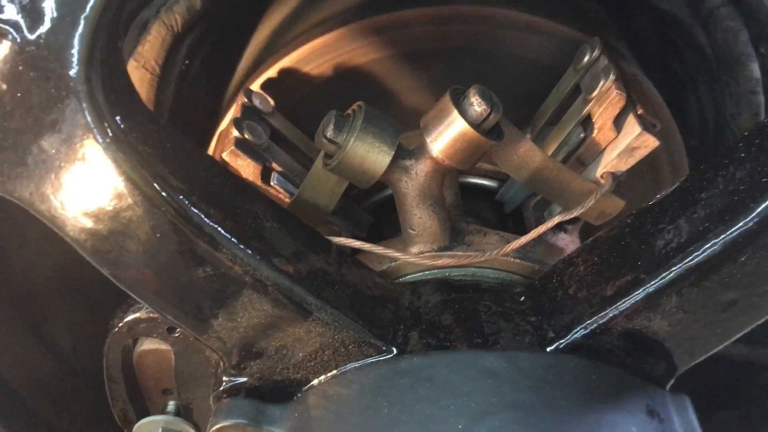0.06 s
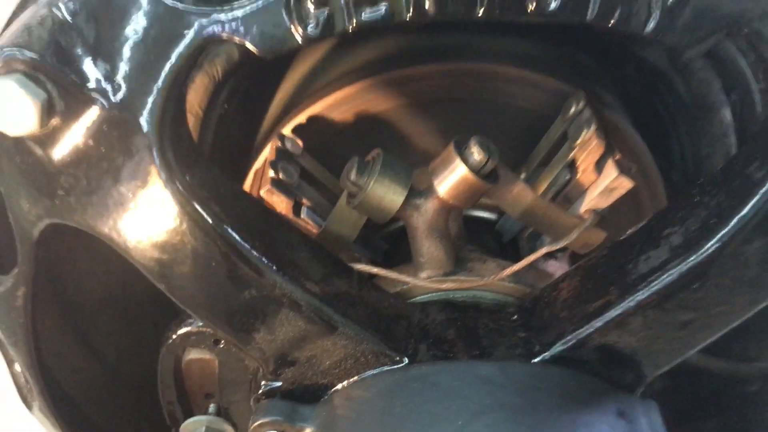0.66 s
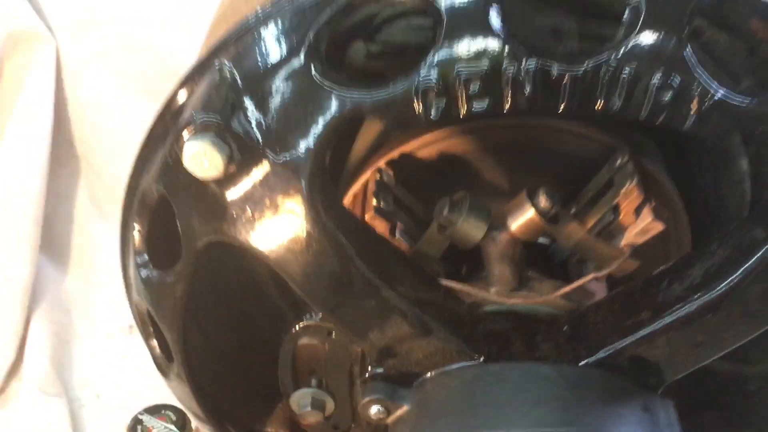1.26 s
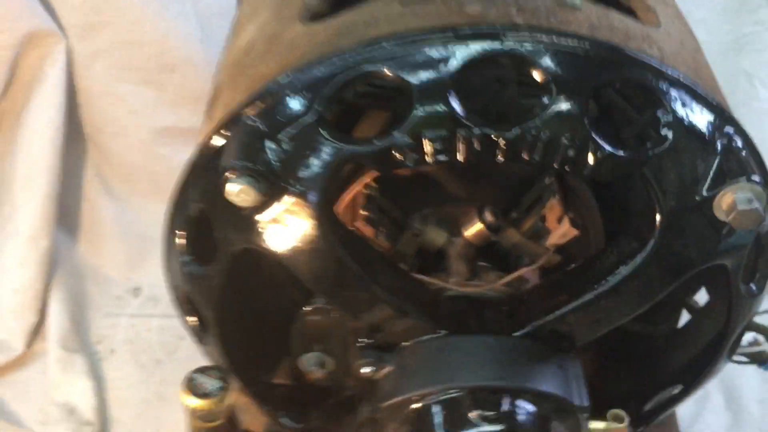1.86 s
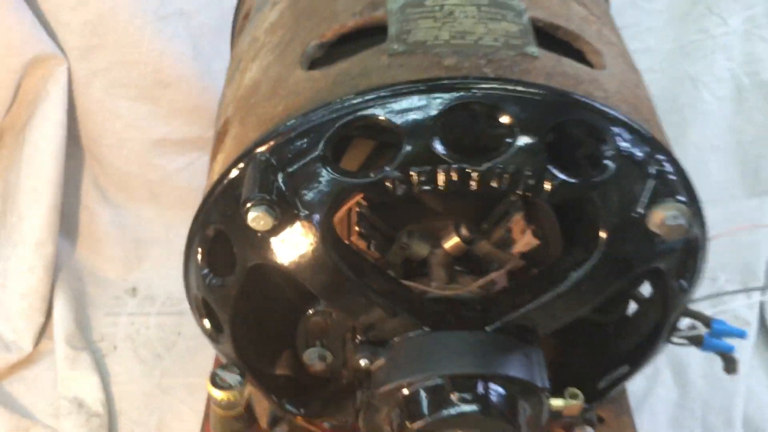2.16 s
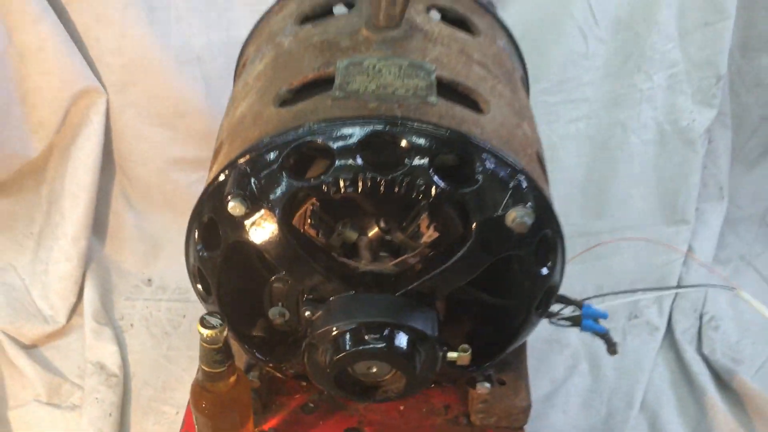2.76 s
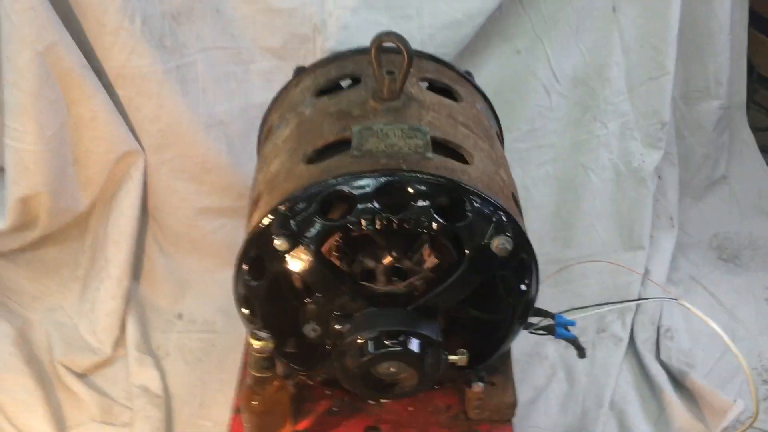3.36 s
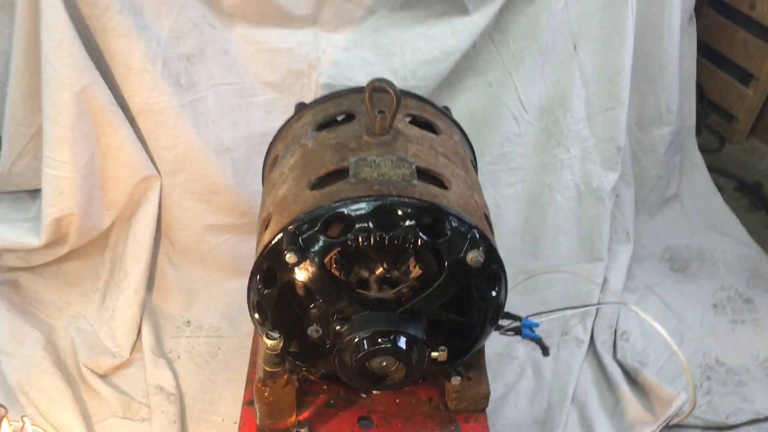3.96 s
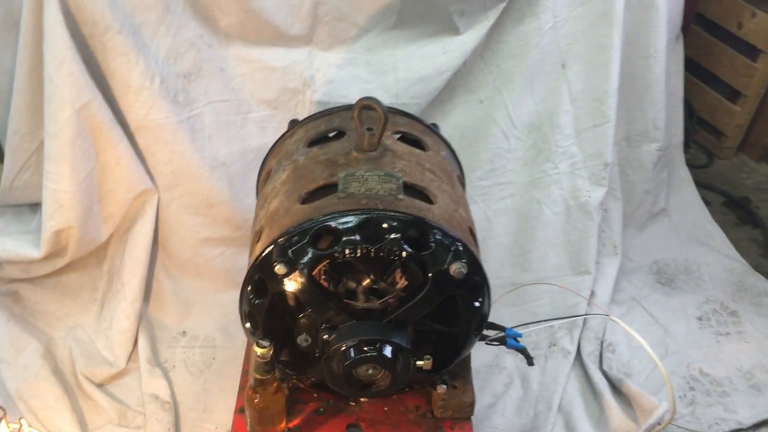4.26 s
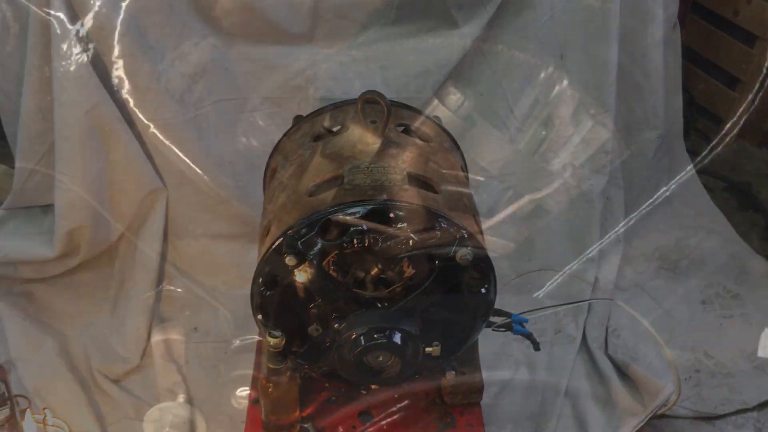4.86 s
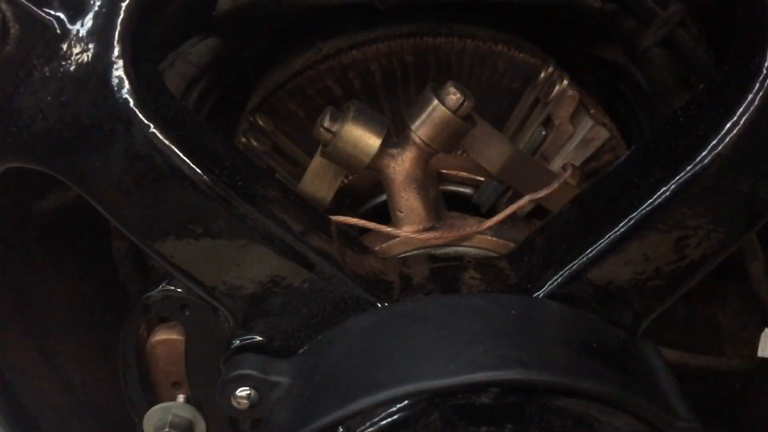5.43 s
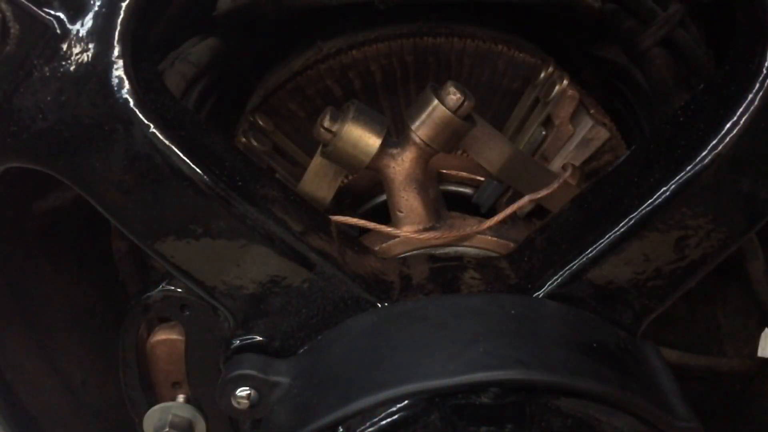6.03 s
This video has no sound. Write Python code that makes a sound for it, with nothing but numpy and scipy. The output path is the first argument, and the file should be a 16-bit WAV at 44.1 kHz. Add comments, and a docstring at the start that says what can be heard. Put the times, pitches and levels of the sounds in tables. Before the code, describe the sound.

Heard up close in a dry-sounding workshop, the brushes of a spinning electric motor rasp and sizzle in a quick rhythm. The pulsing slows gradually and the drone beneath it sinks as the microphone moves away with slight bumps and rumble. Then the motor sound ends suddenly, and only a low room hum and a brief, faint rustle remain.

```python
"""In a quiet workshop, an old open-frame electric motor coasts down as the microphone backs away.
Sliding friction between brushes and commutator makes a scraping that swells four times a turn;
the passing bars add a falling drone, coloured by the resonances of the iron housing.
The motor's sound ends abruptly, leaving the hum of the room and a soft rustle.
A hand on the camera adds low bumps and rumble."""
import sys
import numpy as np
from scipy import signal
from scipy.fft import rfft, irfft, next_fast_len
from scipy.io import wavfile
from scipy.ndimage import uniform_filter1d

SR = 44100
rng = np.random.default_rng(int(sys.argv[2]) if len(sys.argv) > 2 else 0)


def master(y):
    """Save y as 16-bit WAV."""
    cut = np.clip(np.atleast_2d(y).T, -1, 1)
    pcm = np.round(cut * 32767)  # scale
    wavfile.write(sys.argv[1], SR, pcm.astype(np.int16))


N = 272979
T = np.arange(N) / SR
FFT_SIZE = next_fast_len(N + SR // 2, True)
HZ = np.maximum(np.fft.rfftfreq(FFT_SIZE, 1 / SR), 1)
START_TURNS_PER_S, BAR_COUNT = 12.1078, 61
ROOM_ONSET_S = 4.4   # rumble, air and hum begin to rise


def from_db(db):
    """Amplitude ratio of a level in decibels."""
    return 10 ** (np.asarray(db) / 20)


def unit_rms(x):
    """Normalisation to unit mean power."""
    return x / np.sqrt(np.mean(x ** 2) + 1e-20)


def in_time(rows):
    """Linear interpolation of (t/s, value) at every sample."""
    return np.interp(T, *np.transpose(rows))


def spells(rows, fade_s):
    """Sum of trapezoidal envelopes (t/s, duration/s, level/dB)."""
    return sum(from_db(db) * np.clip(.5 + np.minimum(T - start, start + length - T) / fade_s, 0, 1)
               for start, length, db in rows)


def bell(offset, width):
    """Gaussian curve of unit height."""
    return np.exp(-.5 * (offset / width) ** 2)


def spectrum_db(points):
    """Interpolation of (f/Hz, level/dB) on a logarithmic frequency axis."""
    hz, db = np.transpose(points)
    return np.interp(np.log(HZ), np.log(hz), db)


def colour(x, db):
    """Minimum-phase filtering: folding the cepstrum makes the response causal."""
    cepstrum = irfft(np.log(from_db(db)), FFT_SIZE)
    cepstrum[1:FFT_SIZE // 2] *= 2
    cepstrum[FFT_SIZE // 2 + 1:] = 0
    return irfft(rfft(x, FFT_SIZE) * np.exp(rfft(cepstrum)), FFT_SIZE)[:N]


def noise(points):
    """Spectrally shaped Gaussian noise of unit rms."""
    return unit_rms(colour(rng.standard_normal(N), spectrum_db(points)))


def drift(per_s):
    """Random modulation of unit rms, with per_s new values a second."""
    return unit_rms(np.interp(T * per_s, np.arange(N), rng.standard_normal(N)))


def band(x, low_hz, high_hz):
    """Steep, maximally flat band-pass."""
    return signal.sosfilt(signal.butter(5, [low_hz, high_hz], "band", fs=SR, output="sos"), x)


def steady(x):
    """Division by the running rms evens the slow level and keeps the throb."""
    power = uniform_filter1d(uniform_filter1d(x ** 2, SR // 4), SR // 4)
    return x / np.sqrt(power + 1e-20)


def room_tone(air_db=-56.5, waver_db=4.0, early_db=-9.5, rise_s=0.72):
    """Amplitude-modulated hum partials over broadband air noise; both rise late to full level."""
    # workshop hum: f/Hz, level/dB
    partials = [(70.0, -69.5), (215.3, -66), (317.6, -63.5), (430.7, -73.5)]
    # air noise: f/Hz, relative density level/dB
    air_spectrum = [(120, -8), (200, -8.5), (320, -3), (420, 0.5), (650, 2), (850, -1), (1050, -5),
                    (2100, -6.5), (2800, -10.5), (6500, -19.5), (10000, -26.5), (15000, -32)]
    hum = 0
    for hz, db in partials:
        amplitude = np.sqrt(2) * from_db(db + waver_db * drift(5.6))
        hum += amplitude * np.sin(2 * np.pi * (hz * T + rng.random()))
    air = from_db(air_db) * noise(air_spectrum)
    return (hum + air) * from_db(np.interp(T - ROOM_ONSET_S, [0, rise_s], [early_db, 0]))


def rumble(early_db=-69, late_db=-56.5, rise_s=.15):
    """Low-frequency noise of the room, with structure-borne surges as the hand shifts its grip."""
    # shifts of grip: t/s, duration/s, level/dB
    grips = [(2.2, 0.11, -56), (3.87, 0.068, -66), (4.49, 0.13, -49), (5.15, 0.43, -62)]
    # rumble: f/Hz, relative density level/dB
    spectrum = [(20, -28.5), (32, -6.5), (45, -4.5), (60, -0.5), (110, -5.5), (170, -8.5), (260, -10.5),
                (400, -37), (700, -77)]
    floor = from_db(np.interp(T - ROOM_ONSET_S, [0, rise_s], [early_db, late_db]))
    return (floor + spells(grips, fade_s=0.042)) * noise(spectrum)


def rustle():
    """Short bursts of broadband noise, heard as a soft rustle at the end."""
    # strokes: t/s, duration/s, level/dB
    strokes = [(5.45, .22, -64), (5.59, 0.044, -62), (5.675, 0.14, -54.5), (5.94, .085, -62)]
    # rustle: f/Hz, relative density level/dB
    spectrum = [(350, -41), (600, -7), (715, -14), (1310, -14), (1650, -3), (2900, -13.5), (3230, -10.5),
                (6510, -10.5), (15000, -20)]
    return spells(strokes, fade_s=0.025) * noise(spectrum)


def camera_bumps(attack_s=.004):
    """Soft impacts of the hand excite damped normal modes of the camera case."""
    # impacts: t/s, excitation level/dB
    knocks = [(2.196, -31), (3.014, -32.5), (4.666, -32)]
    # case modes: f/Hz, gain/dB, T60/s
    modes = [(60.4, -20, 0.29), (135, -12.5, 0.12), (207, -4.5, 0.091), (300, -3.5, 0.05), (360, -6, 0.14)]
    out = np.zeros(N)
    for start, knock_db in knocks:
        t = np.maximum(T - start, 0)
        push = from_db(knock_db) * np.minimum(t / attack_s, 1)
        for k, (hz, db, t60) in enumerate(modes):
            decay = np.exp(-np.minimum(np.log(1000) * t / t60, 20))
            out += (-1) ** k * push * from_db(db) * np.sin(2 * np.pi * hz * t) * decay
    return out


def reverberate(x, t60=0.14, wet_db=-15.5):
    """Direct sound plus a faint diffuse field that decays exponentially in the cloth-damped room."""
    t = T[:SR // 3]
    tail = rng.standard_normal(len(t)) * from_db(-60 * t / t60) * (t > .004)
    return x + from_db(wet_db) * signal.fftconvolve(x, tail / np.linalg.norm(tail))[:N]


def shaft(friction_turns_per_s2=.5893, drag_per_s=.04656, start_turns=.1192):
    """Speed (turns/s) and angle (turns) of a rotor slowed by dry friction and linear air drag."""
    balance = friction_turns_per_s2 / drag_per_s
    speed = (START_TURNS_PER_S + balance) * np.exp(-drag_per_s * T) - balance
    return speed, start_turns + np.cumsum(speed) / SR


def bar_lines(speed, angle, resonance_hz=497, width_hz=19, swell_db=10):
    """Uneven bars excite shaft harmonics; any that glides through the housing resonance swells."""
    # harmonics: f / shaft frequency
    orders = (51, 59, 63, 71, 122, 127, 180, 184)
    # their strengths: relative level/dB
    levels = (3.8, 11.3, 13.3, 2.3, 3.5, 10, 10, 8.3)
    out = 0
    for order, db in zip(orders, levels):
        in_tune = bell(order * speed - resonance_hz, width_hz)
        out += 2 * from_db(db + swell_db * in_tune) * np.sin(2 * np.pi * (order * angle + rng.random()))
    return out * (speed / START_TURNS_PER_S) ** 0.84   # weaker as the shaft slows


def commutator(speed, angle, fine_order=900.0, fresh_db=-5.0, wander_per_s=1.493, size=32768):
    """Quasi-periodic excitation: much the same roughness passes each turn, its finest detail new."""
    # roughness humps at successive multiples of the bar rate: level/dB, width/shaft orders
    bar_humps = [(5, 10), (8.5, 6), (2, 7), (5.5, 5), (1.5, 6)]
    orders = np.arange(size // 2 + 1)
    humps_db = sum(db * bell(orders - k * BAR_COUNT, width) for k, (db, width) in enumerate(bar_humps, 1))
    height = from_db(humps_db) / np.hypot(1, orders / fine_order)
    # end play of the shaft slides the brushes slowly between four neighbouring tracks
    tracks = size * irfft(height * np.exp(2j * np.pi * rng.random((4, len(orders)))))
    shares = np.array([drift(wander_per_s) for track in tracks])
    shares /= np.linalg.norm(shares, axis=0)
    worn = sum(share * np.interp(angle % 1 * size, np.arange(size), track)
               for share, track in zip(shares, tracks))
    bars = bar_lines(speed, angle)
    samples_per_turn = SR / speed.mean()
    high_pass = HZ / np.hypot(HZ, fine_order * speed.mean())
    fresh = colour(rng.standard_normal(N), 20 * np.log10(np.hypot(from_db(fresh_db), high_pass)))
    return (worn + bars) / np.sqrt(samples_per_turn) + fresh


def brush_force(angle, snag_turns=0.035, wander_db=1.5):
    """Normal force, light contact being 1: smooth swells at high spots, a sudden snag at each burr."""
    # high spots: angle/turns, width/turns, force level/dB
    high_spots = [(.015, 0.035, 1.5), (.17, 0.013, -10), (.255, 0.044, 6), (.5, 0.051, 3.5),
                  (.76, 0.037, 2)]
    # two burrs: angle/turns
    burr_angles = (.715, .97)
    # each burr grazing the brush: force level/dB
    graze_levels = (-1, 2)
    # a burr catching hard: t/s, duration/s, force level/dB, burr index
    catches = [(0.93, 0.22, 7, 0), (2.698, 0.44, 8, 1), (3.53, 0.87, 9.5, 0), (4.55, .16, 10.5, 0),
               (4.86, 0.52, 4.5, 1)]
    swells = sum(from_db(db) * bell((angle - at + .5) % 1 - .5, width) for at, width, db in high_spots)
    snags = 0
    for k, (at, graze_db) in enumerate(zip(burr_angles, graze_levels)):
        caught = spells([spell for *spell, burr in catches if burr == k], fade_s=.12)
        snags += (from_db(graze_db) + caught) * np.exp(-((angle - at) % 1) / snag_turns)
    snags = uniform_filter1d(snags, SR // 700)   # compliance of the carbon rounds the edge
    return 1 + (swells + snags) * from_db(wander_db * drift(50))


def housing(x, away):
    """Resonances and notches of the iron shell filter the scraping, differently near and far."""
    # spectral envelope of the scraping: f/Hz, gain/dB
    envelope = [(100, -37), (260, -28.5), (420, -17), (620, -14), (1300, -12), (1750, -12), (2300, -2.5),
                (3600, -1.5), (5500, -3.5), (8000, 1.5), (9500, -2), (10400, -10.5), (13300, -11.5),
                (15800, -21)]
    # resonances and notches: f/Hz, width/Hz, near gain/dB, far gain/dB
    resonances = [(206, 17, 12, -1), (340, 27, 3, 2.5), (459, 16, -0.5, -5), (489, 20.6, 8, 11),
                  (552.5, 31.4, 3, 11.5), (708, 36, 8, 3), (848, 25.5, 6.5, 13), (957, 96, -7, -7),
                  (1087, 43, 5, 5), (1193, 16.5, 7.5, 8), (1717, 14, 0.5, 7), (1810, 40, 1.5, -2),
                  (1983, 110, 6, -2.5), (2170, 64, 1.5, 4.5), (2290, 63, -6, -1.5), (2800, 160, -7, -0.5),
                  (3120, 60, -2.5, 6), (3454, 260, 5, -0.5), (4540, 320, 4, 1.5), (4890, 55.5, -8, -7.5),
                  (5170, 95, 3.5, -0.5), (7400, 210, 0, 2), (7820, 320, -5.5, -3), (8800, 340, 1.5, 0),
                  (12200, 680, 4, -0.5)]
    near = far = spectrum_db(envelope)
    for hz, width_hz, near_db, far_db in resonances:
        peak = bell(HZ - hz, width_hz)
        near, far = near + near_db * peak, far + far_db * peak
    return (1 - away) * colour(x, near) + away * colour(x, far)


def holder_song(force, ring_hz=2194.0, bandwidth_hz=54.0, quiet_db=-24):
    """Forced vibration: friction drives a narrow resonance of a brush holder, faint between songs."""
    # songs: t/s, duration/s, level/dB re the rasp
    songs = [(2.76, 0.25, -12), (4.62, .13, -11.5), (5.4, 0.046, -23)]
    b, a = signal.iirpeak(ring_hz, ring_hz / bandwidth_hz, fs=SR)
    ring = unit_rms(signal.lfilter(b, a, force ** 2 * rng.standard_normal(N)))
    return (from_db(quiet_db) + spells(songs, fade_s=0.052)) * ring


def motor(sizzle_db=-0.75, drone_near_db=-18.5, drone_far_db=-11.5, end_s=5.443):
    """Sliding friction: the higher the band, the more it follows brush force and carbon grit."""
    # microphone path: t/s, position (0 at the brush opening, 1 a metre away)
    path = [(0, 0.15), (1, 0.099), (2, 0.46), (3.2, 0.85), (5.4, 0.87)]
    # rasp at the microphone, the reference for the other parts: t/s, level/dB
    levels = [(0, -21.5), (0.7, -21), (1.5, -22.5), (1.97, -21), (2.95, -25), (4.2, -28), (5.44, -30)]
    speed, angle = shaft()
    away = np.clip(in_time(path), 0, 1)
    friction, force, grit_db = commutator(speed, angle), brush_force(angle), drift(2500)
    drone = band(friction * force ** 0.11, 60, 1400)
    rasp = band(friction * force ** 0.54 * from_db(grit_db), 1400, 6000)
    sizzle = band(friction * force * from_db(2 * grit_db), 6000, 19000)
    drone, rasp, sizzle = [steady(housing(part, away)) for part in (drone, rasp, sizzle)]
    sizzle *= from_db(sizzle_db) * (speed / START_TURNS_PER_S) ** 0.83   # dies faster than the rasp
    drone *= from_db((1 - away) * drone_near_db + away * drone_far_db)   # carries further
    sound = from_db(in_time(levels)) * (rasp + sizzle + drone + holder_song(force))
    gate = np.interp(T, [end_s - .001, end_s + .001], [1, 0])
    return reverberate(sound) * gate


def scene():
    """Superposition of motor, camera and room at one microphone."""
    return (motor() + camera_bumps() + rumble() + room_tone() + rustle())[None]


def record(dry, cutoff_hz=15850):
    """Soft saturation rounds the highest peaks; a steep low-pass limits the bandwidth."""
    low_pass = signal.ellip(12, .1, 80, cutoff_hz, fs=SR, output="sos")
    return signal.sosfilt(low_pass, np.tanh(dry))


dry = scene()
out = record(dry)
master(out)
```